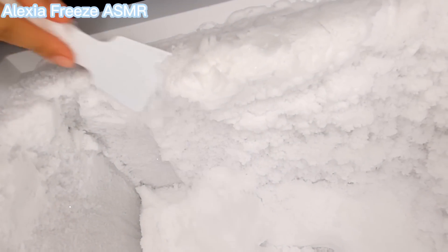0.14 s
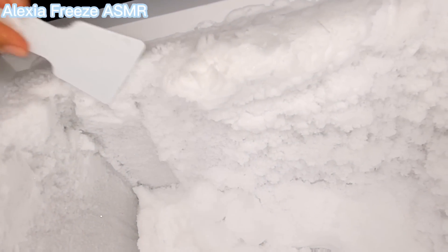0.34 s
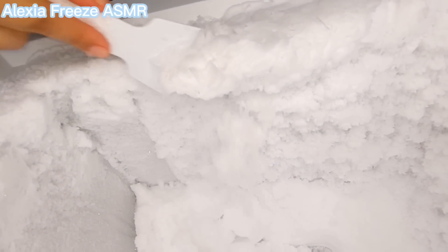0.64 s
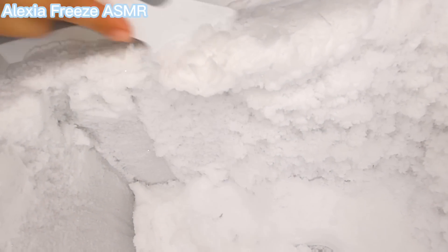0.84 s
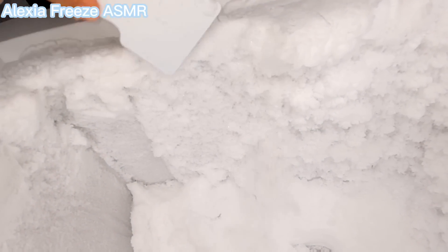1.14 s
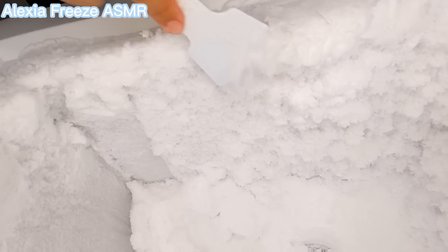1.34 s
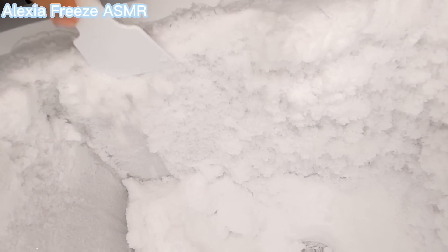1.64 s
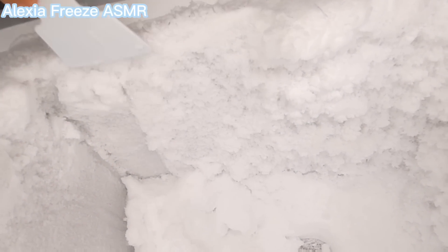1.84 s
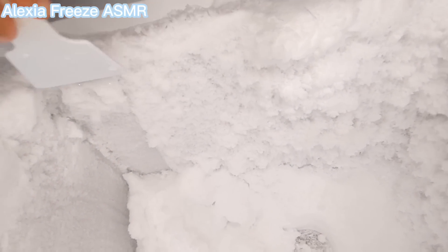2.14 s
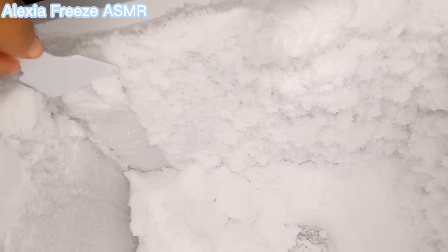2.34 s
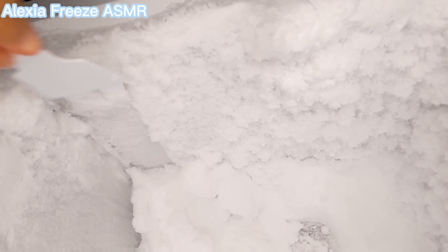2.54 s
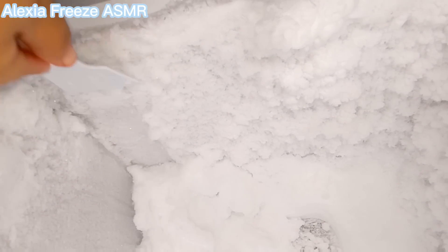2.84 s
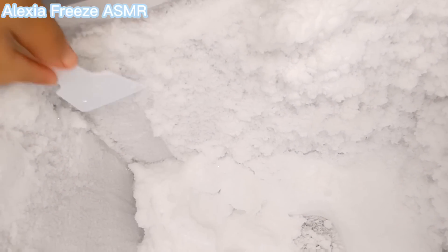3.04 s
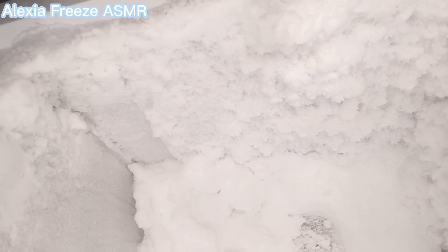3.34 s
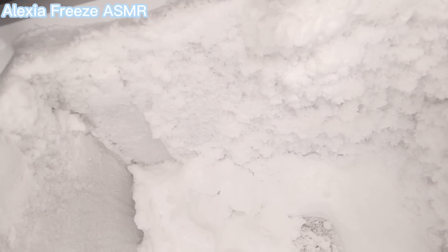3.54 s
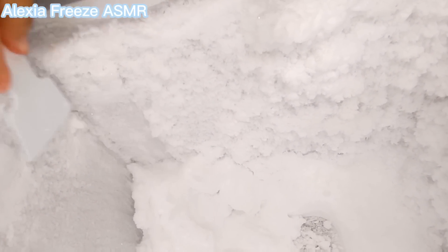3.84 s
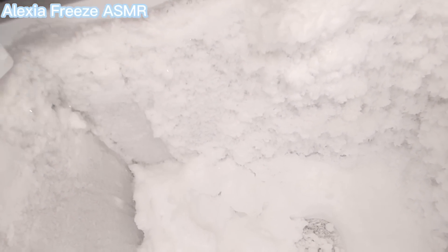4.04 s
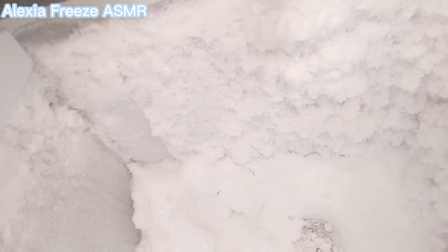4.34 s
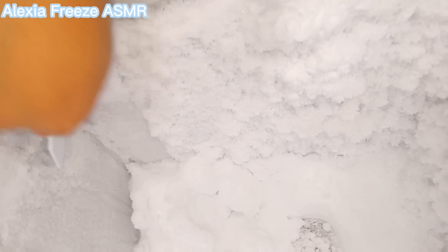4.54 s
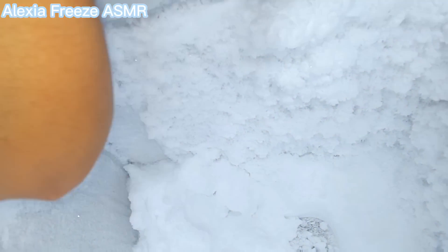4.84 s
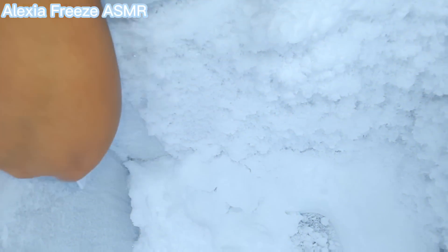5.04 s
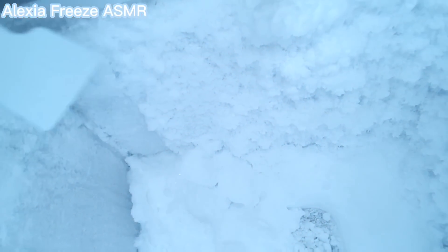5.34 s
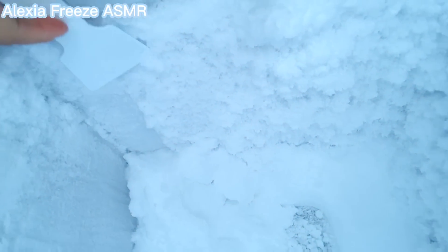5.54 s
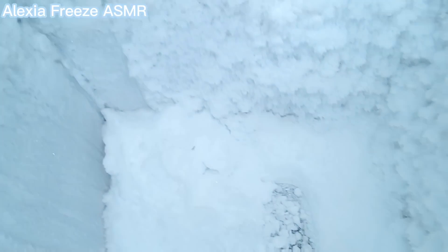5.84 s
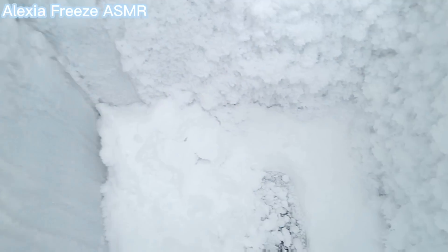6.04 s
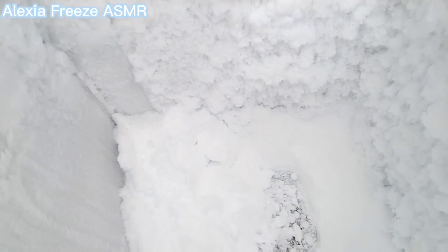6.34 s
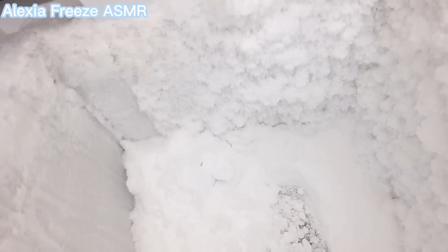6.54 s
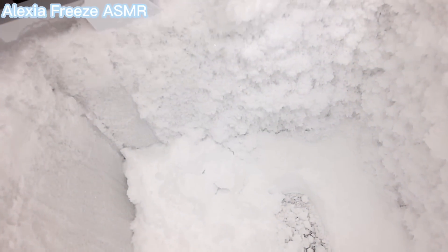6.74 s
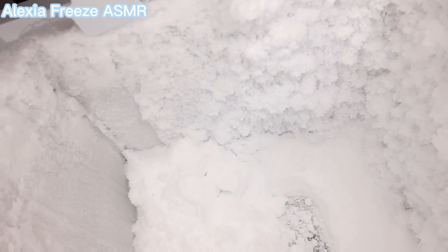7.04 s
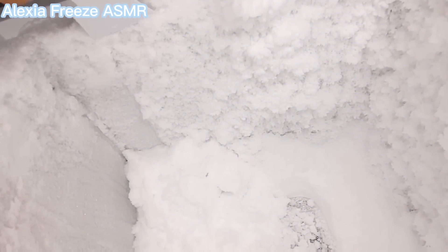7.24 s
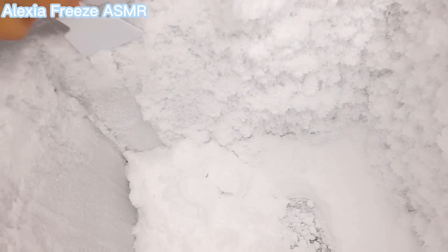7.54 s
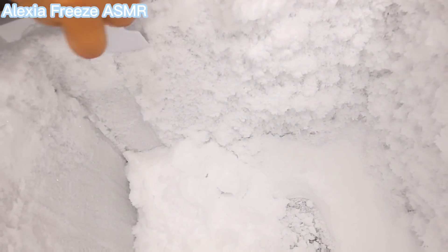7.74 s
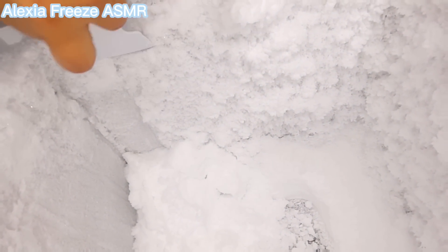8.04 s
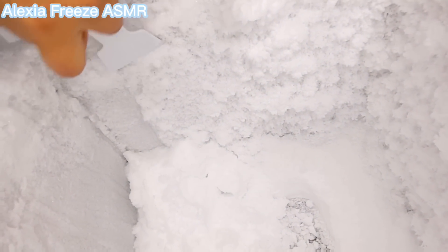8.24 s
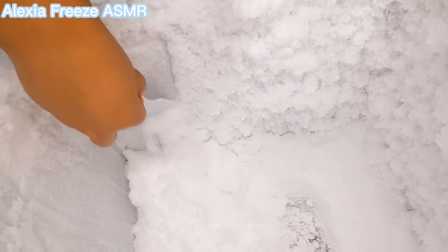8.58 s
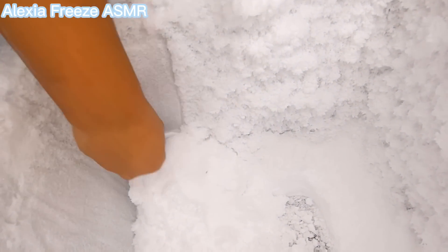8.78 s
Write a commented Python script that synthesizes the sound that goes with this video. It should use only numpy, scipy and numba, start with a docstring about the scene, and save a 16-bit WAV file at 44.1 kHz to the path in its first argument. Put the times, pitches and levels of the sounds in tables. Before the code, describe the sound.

Close, gritty scraping of frost inside a freezer, uneven quick strokes with crisp ice cracks, dull panel thumps, occasional knocks and a low hum.

```python
"""From the start a plastic scraper rasps in short strokes through thick frost inside a chest freezer.
Cracking ice crystals ring the blade, crust snaps off, and the push makes the freezer panels boom.
From 1.6 s something now and then knocks by the left port, most often from 5.6 s to 6.6 s.
The last half second is one long scrape. Short echoes from the box, the freezer's low hum and the rumble
of a hand on the stereo microphone run throughout. All sounds are filtered noise, clicks and sine waves."""
import sys
import numpy as np
from scipy import signal
from scipy.fft import rfft, irfft
from scipy.io import wavfile
from scipy.ndimage import uniform_filter1d
from numba import njit

SR = 44100
rng = np.random.default_rng(int(sys.argv[2]) if len(sys.argv) > 2 else 0)


def digitize_waveform(pressure):
    """Quantize a signal to 16-bit integers and store it at the path in sys.argv[1].

    Rows of a 2-D input are taken as channels; values are limited to [-1, 1].
    """
    field = np.atleast_2d(pressure).T
    bounded = np.clip(field, -1, 1)
    quanta = np.round(bounded * 32767).astype(np.int16)
    wavfile.write(sys.argv[1], SR, quanta)


N = 392931

# how hard the edge scrapes, one list of points a stroke: t/s, relative level/dB
STROKE_LEVELS = [
    [(0.0, -31), (0.148, -23), (0.166, -12), (0.266, -19.5), (0.296, -33.5), (0.332, -31.5), (0.352, -38),
     (0.36, -35)],
    [(0.36, -24), (0.426, -21.5), (0.456, -41), (0.466, -39), (0.48, -29), (0.494, -25), (0.5, -38)],
    [(0.5, -14), (0.504, -19.5), (0.542, -13.5), (0.548, -20), (0.582, -13.5), (0.644, -22.5), (0.678, -36),
     (0.7, -32)],
    [(0.7, -44), (0.714, -25.5), (0.772, -21), (0.792, -39), (0.806, -19.5), (0.812, -35), (0.85, -33)],
    [(0.85, -40), (0.864, -23.5), (0.922, -16), (0.98, -14), (1.02, -37), (1.03, -29), (1.164, -57),
     (1.2, -41)],
    [(1.2, -25), (1.214, -24.5), (1.254, -27), (1.312, -16), (1.324, -20.5), (1.354, -14.5), (1.426, -18),
     (1.47, -27)],
    [(1.47, -24.5), (1.522, -13.5), (1.604, -24.5), (1.648, -15.5), (1.656, -25), (1.74, -14),
     (1.772, -29.5), (1.78, -26)],
    [(1.78, -30), (1.796, -21), (1.822, -37.5), (1.884, -19.5), (1.964, -29.5), (1.968, -25),
     (2.004, -35.5), (2.015, -13)],
    [(2.015, -19.5), (2.035, -7), (2.045, -26), (2.153, -35), (2.173, -24.5), (2.207, -51), (2.301, -59),
     (2.317, -46)],
    [(2.317, -18), (2.353, -6), (2.373, -27), (2.399, -23), (2.461, -34), (2.475, -22.5), (2.651, -48.5),
     (2.662, -30)],
    [(2.662, -17), (2.71, -15), (2.716, -24), (2.754, -12.5), (2.828, -23), (2.848, -38), (2.906, -46),
     (2.92, -28)],
    [(2.92, -24), (2.946, -29), (3.002, -19.5), (3.08, -17), (3.09, -30), (3.266, -63.5), (3.506, -69),
     (3.52, -31)],
    [(3.52, -33), (3.524, -19.5), (3.558, -28.5), (3.594, -24), (3.626, -39.5), (3.764, -61), (3.82, -71),
     (3.837, -32)],
    [(3.837, -14.5), (3.881, -22.5), (3.891, -14), (3.911, -32.5), (3.923, -23.5), (3.981, -40),
     (4.139, -48), (4.156, -21)],
    [(4.156, -13.5), (4.178, -14), (4.196, -29.5), (4.25, -11), (4.284, -28.5), (4.304, -22),
     (4.348, -32.5), (4.378, -19)],
    [(4.378, -19), (4.418, -18), (4.436, -33.5), (4.472, -18.5), (4.592, -15.5), (4.606, -30), (4.62, -24)],
    [(4.62, -25), (4.73, -22), (4.758, -20), (4.764, -26), (4.84, -29), (4.86, -41), (4.886, -47),
     (4.894, -33)],
    [(4.894, -25.5), (4.946, -14), (5.106, -24.5), (5.248, -71), (5.274, -40), (5.282, -58), (5.506, -67),
     (5.517, -34)],
    [(5.517, -19), (5.581, -30.5), (5.605, -18), (5.661, -36), (5.675, -31.5), (5.717, -48), (5.735, -37.5),
     (5.77, -50)],
    [(5.77, -50), (5.786, -30), (5.794, -37), (5.858, -51), (5.882, -30), (5.896, -41.5), (5.936, -36),
     (5.944, -33)],
    [(5.944, -22.5), (5.998, -23), (6.08, -54), (6.084, -38), (6.246, -62.5), (6.306, -40), (6.388, -76),
     (6.396, -45)],
    [(6.396, -30), (6.43, -50), (6.44, -36), (6.462, -41), (6.476, -38), (6.49, -41), (6.544, -21),
     (6.66, -37.5)],
    [(6.66, -32), (6.67, -35.5), (6.74, -30), (6.768, -18.5), (6.806, -29), (6.862, -16.5), (6.898, -40),
     (6.905, -31)],
    [(6.905, -28), (6.909, -23), (6.927, -42), (7.003, -58), (7.015, -38), (7.047, -36), (7.103, -66),
     (7.137, -33)],
    [(7.137, -28.5), (7.161, -12.5), (7.227, -37.5), (7.235, -24), (7.257, -41), (7.349, -23),
     (7.449, -55.5), (7.52, -27.5)],
    [(7.52, -13), (7.6, -20), (7.626, -31.5), (7.658, -21.5), (7.816, -19.5), (7.874, -21.5), (7.898, -33),
     (7.903, -21)],
    [(7.903, -21), (7.917, -17.5), (8.025, -28.5), (8.033, -27), (8.105, -37), (8.125, -37), (8.135, -32),
     (8.145, -25)],
    [(8.145, -20), (8.169, -15), (8.189, -25.5), (8.229, -17), (8.245, -28.5), (8.313, -12.5),
     (8.343, -23.5), (8.35, -23)],
    [(8.35, -22), (8.396, -14.5), (8.884, -12.5), (8.91, -15)],
]
# colour of the coarse rasp: f/Hz, relative level per Hz/dB
RASP_COLOUR = [(150, -46.5), (250, -9), (358, -19), (555, -6), (920, -5.5), (1300, -6), (1810, -4),
               (2270, -6), (4720, -13.5), (6000, -20.5), (7800, -32.5), (13200, -120)]
# colour of the fine crystal hiss: f/Hz, relative level per Hz/dB
HISS_COLOUR = [(2060, -20.5), (3500, -1.5), (4710, -8.5), (7010, -0.5), (7640, -4), (9210, -1.5),
               (10700, -3), (12500, 0.5), (15400, -0.5)]
FIRM_DB = -20   # scrape level of a firm stroke


def scraper():
    """Shared stick-slip clumps shape rasp and hiss; the scrape level also sets the panels' boom."""
    bite_hiss_db, bite_s = 3, 0.075   # fresh crystals hiss brighter as a stroke bites, then this fades
    hiss_follows = 0.18   # harder scraping is brighter: dB per dB relative to a firm stroke
    wander_db, ring_wander, wander_hz = 2.5, .04, 10   # the hold is never quite still
    chip_per_slip = 0.83   # a jerky blade breaks off bigger chips: dB per dB of stick-slip

    scrape_db, = in_time([row for stroke in STROKE_LEVELS for row in stroke])
    since_s, (ring_hz, ring_db, low_db, hiss_db, slip_db, pan_db, load_db) = grip()
    hiss_db = hiss_db + bite_hiss_db * np.exp(-since_s / bite_s)
    hiss_db = hiss_db + hiss_follows * (scrape_db - FIRM_DB)
    ring_hz = ring_hz * (1 + ring_wander * drift(wander_hz))
    ring_db, low_db, hiss_db = [db + wander_db * drift(wander_hz) for db in (ring_db, low_db, hiss_db)]

    # rasp, ring and hiss share the power
    rasp_db = scrape_db - 10 * np.log10(1 + amp(2 * hiss_db) + amp(2 * ring_db))
    slip_db = np.clip(slip_db, 0, 8)
    clump_db = slip_db * (drift(190) + 0.35 * drift(16.6))
    clump_db = clump_db - 0.22 * slip_db ** 2   # deeper slips keep about the same mean power

    # both ports hear the middle of the edge; hand and frost hide each end from the far port
    middle, left, right = [shavings(clump_db, slip_db, ring_hz, ring_db, low_db, hiss_db) for _ in range(3)]
    edge = middle + amp(1.5) * np.array([left, right])
    edge = edge * amp([pan_db / 2 + 4.0, -pan_db / 2 - 0.5]) * amp(rasp_db - 3.5)

    chip_level_db = scrape_db + chip_per_slip * (slip_db - 3)
    crust = box(ports(snaps(chip_level_db)), t60=.008, wet_db=-3, size=512)
    return box(ports(edge), t60=.02, wet_db=-5, size=1024) + crust + panels(scrape_db, load_db)


def grip():
    """The hold of the blade at every sample, smoothed where it changes, and the time since the stroke began."""
    regrip_s = 0.073   # the hand settles into a new hold
    # one row a hold: start t/s, ring f/Hz, ring over rasp/dB, lowest blade modes over rasp/dB,
    # hiss over rasp/dB, stick-slip depth/dB, left over right/dB, load on the panels/dB
    holds = [(0, 2370, -3, -9, 5, 2.5, -4.5, 0), (.36, 2190, -5, -13, 2.5, 3, -3, 1),
             (.5, 2380, 1.5, -14, 4, 2.5, -4.5, 0), (.85, 2350, -0.5, -6.5, 6, 3, -4, -4.5),
             (1.2, 2270, -8.5, -5.5, 8, 2.5, -2.5, -1.5), (1.6, 2690, 0, -7.5, 6, 2.5, -4, 0.5),
             (2.015, 2430, -4, -1.5, 11, 4.5, -1.5, -3.5), (2.317, 2480, -3, -3, 10, 3, 2, -1.5),
             (2.662, 2410, -3.5, -13, 3.5, 3.5, 0.5, 1), (2.92, 2320, -9, 2, -0.5, 4, -2.5, -12),
             (3.0, 2300, 0.5, -7, 13, 4, -2, 0.5), (3.1, 2270, -6, -7, 2, 2.5, -1.5, 0),
             (3.52, 1900, -13, -5, 0, 2.5, 1.5, 2), (3.837, 2230, 2, -8, 3.5, 4, 0, 3),
             (4.156, 2130, 2.5, -3, 4.5, 3.5, 1, 1.5), (4.378, 2070, 3.5, -10, 8, 3.5, -2, -0.5),
             (4.62, 2110, -2.5, -11, 1, 3.5, 1, -1.5), (4.9, 2160, -2.5, -23, 0.5, 2.5, -2.5, -3.5),
             (5.517, 2330, -2.5, -5.5, -1.5, 4, -2.5, 0.5), (5.94, 2080, -29, -4, 8, 2, 2, 3.5),
             (6.396, 2170, -8, -8, 7.5, 3.5, 0.5, 1.5), (6.66, 2000, -5.5, -3, 8.5, 2.5, 0.5, 1),
             (6.9, 1870, -2, -1.5, 6, 2.5, 0, 3), (7.14, 1820, -7, -4, 3.5, 3, 1.5, -3),
             (7.27, 1690, 2, 2, 5.5, 3, 1.5, 2), (7.52, 2230, -12.5, -3, 1.5, 2, 0, -1),
             (7.903, 2780, -6.5, -9, 5.5, 2.5, -0.5, -1), (8.15, 2870, -3.5, -6.5, 6.5, 2, 0, 3),
             (8.359, 1590, -3.5, 0.5, -0.5, .5, -0.5, 5), (8.44, 1530, -2.5, -3.5, 9.5, 1, -2, -4.5),
             (8.66, 2000, 1, -14, 11.5, 2, -4, -14), (8.72, 2300, 4, -6, 6.5, -2.2, 0, -7)]
    t = np.arange(N) / SR
    rows = np.array(holds, float)
    starts = np.array([stroke[0][0] for stroke in STROKE_LEVELS])
    held = rows[np.searchsorted(rows[1:, 0], t), 1:].T
    since_s = t - starts[np.searchsorted(starts[1:], t)]
    return since_s, uniform_filter1d(held, int(regrip_s * SR) + 1)


def shavings(clump_db, slip_db, ring_hz, ring_db, low_db, hiss_db):
    """One stretch of the edge: coarse cracks rasp and ring the blade, fine ones hiss."""
    # plastic blade modes, low to high: f/Hz, width/Hz, relative level/dB
    blade_modes = [(1277, 51, 0), (1431, 55, -0.5), (3170, 330, 5), (4700, 140, -40), (7080, 90, -7)]
    spread_db = 2.0 + 0.75 * slip_db   # a jerky blade breaks uneven pieces, a steady one shaves powder
    coarse = cracks(7000, spread_db, clump_db)
    flexing = cracks(7000, spread_db, clump_db)
    fine = cracks(14000, spread_db, clump_db + 0.65 * slip_db * drift(260))

    rasp = rms_one(colour(coarse + amp(-1.5) * resonances(coarse, blade_modes[2:4]), RASP_COLOUR))
    ring = amp(ring_db) * rms_one(moving_ring(flexing, ring_hz, 220.0, SR))
    low_ring = amp(low_db) * rms_one(resonances(flexing, blade_modes[:2]))
    hiss = rms_one(colour(fine + amp(-6) * resonances(fine, blade_modes[4:]), HISS_COLOUR))
    return rasp + ring + low_ring + amp(hiss_db) * hiss


def cracks(per_s, spread_db, clump_db):
    """Crystals break at random, mostly small, in clumps of a few ms as the edge sticks and slips."""
    sizes = amp(spread_db * np.minimum(rng.exponential(1, N), 5)) * rng.choice([-1, 1], N)
    clicks = sizes * (rng.random(N) < per_s / SR)
    even = clicks / np.sqrt(uniform_filter1d(clicks ** 2, SR // 4))   # same power in each quarter second
    return even * amp(clump_db)


@njit
def moving_ring(x, hz, width_hz, rate):
    """A resonance whose centre follows a curve, like a blade whose free length changes."""
    out, r = np.zeros(len(x)), np.exp(-np.pi * width_hz / rate)
    for i in range(2, len(x)):
        feedback = 2 * r * np.cos(2 * np.pi * hz[i] / rate) * out[i - 1] - r * r * out[i - 2]
        out[i] = x[i] - x[i - 2] + feedback
    return out


def snaps(chip_level_db):
    """Crust snaps at each port: a sharp tick that rings the blade, then crumbs dying in a few ms."""
    # crusts that snap: t/s, level/dB, left over right/dB, crumbs over level/dB, treble over body/dB
    crusts = [(0.0726, -4, -4, -12, 5), (0.1223, -5, -9, -13, 6), (0.1535, -18, -6.5, -13, -2),
              (0.3262, -5, 21, -8, -8), (0.3625, 3, 0, -8, -10), (0.4805, -8, -16, -13, -2),
              (0.5074, -10, -10, -11, 12), (0.5347, -7, 5, -15, -7), (0.8046, -15, 3, -13, -6),
              (0.9093, -14, -3, -13, 0), (1.0335, -9, -1, -16, 7), (1.1967, -23, -10, -16, 6),
              (1.5716, -1, -7.0, -13, 7), (1.6158, 0.5, -3, -16, 11), (1.969, 6, 5, -14, -5),
              (2.017, -2, -7, -13, 5), (2.0593, 2, 7, -10, -3), (2.1704, -16, -7, -13, 9),
              (2.3156, -3, -1, -14, 9), (2.4029, -1.5, 0, -14, 3), (2.4778, -10, -14, -12, 9),
              (2.5117, -13, -13, -11, 5.5), (2.6275, -18, -11, -11, 0), (2.6642, 8, 3, -12, 2),
              (2.7094, -8, -3.5, -13, -2), (2.7995, -6, -4, -13, -1), (2.923, 4, 5, -11.5, -5),
              (2.9966, -9, -7.0, -13, -2), (3.0553, 4, -9, -12, -9), (3.5225, -8, -16, -8, 5.5),
              (3.8367, -2, -15, -13, 2), (3.8871, -4, -8, -10, 0), (3.921, -7, 0, -15, 8),
              (4.0128, -22, 2, -13, 5), (4.0395, -21, -3, -13, 3), (4.1576, 1, -7, -9, 4),
              (4.2148, 2.5, 0, -13, -8), (4.243, 2, -8, -13, 2), (4.3196, -7, 9, -13, -4),
              (4.3795, 6, -9, -11, -14), (4.449, -15, -21, -13, 4), (4.6354, -18, 3, -13, 0),
              (4.7471, -2, -9, -7, -8), (4.894, -10, 1, -13, 0), (5.2699, -31, 2, -13, -3),
              (5.518, -4.5, -6, -13, 0.5), (5.5955, -14, -9, -11, 6), (5.6086, -11, 7, -15, -7),
              (5.671, -29, 4, -13, 0), (5.7354, -16, -3, -13, -5), (5.7813, -18, -10, -15, -1),
              (5.8162, -34, 4, -13, -5), (5.8807, -8, 4, -14, 5.5), (5.9204, -25, -6, -13, 3),
              (5.9443, -8, -11, -15, 4), (6.0876, -8, -5, -10, -17), (6.1014, -26, 2.0, -13, 0),
              (6.1485, -23, -4, -13, 3), (6.3975, -5, 1, -13, -6), (6.4388, -4.5, 14, -13, -15),
              (6.4742, -26, 1.5, -11, -4), (6.5844, -9, -7.5, -16, 3), (6.616, -7, -3.0, -15, -2),
              (6.766, -11, -7, -11, -1), (6.838, -10, -4, -13, 11), (6.9075, -10, -5, -13, 7),
              (7.019, -18, -5, -13, 2), (7.1365, -8, -1, -13, 2), (7.2365, -3, 0, -13, 1.5),
              (7.3522, -5.5, -12, -9, 1), (7.4794, -8.5, -2, -14, -3), (7.5212, 8, 4, -13, -5),
              (7.9042, 1, -8, -13, -2), (8.0327, 6, -7, -12, -5), (8.1233, -10.5, -3, -14, 7.5)]
    tick_db = 7   # the first sharp break, over the snap's level
    chip_count, chip_db, chip_spread_db, chip_pan_db = 160, 8, 5, -3   # small snaps at random times

    dull, bright = np.zeros((2, 2, N + SR))
    t = np.arange(SR // 16) / SR
    grit = rng.standard_normal(N + SR)
    when, size, side, loose, sharp = rng.random((chip_count, 5)).T
    chip_sizes_db = chip_level_db[(when * N).astype(int)] + chip_db - chip_spread_db * np.log(1 - .9 * size)
    chips = np.transpose([when * N / SR, chip_sizes_db, chip_pan_db + 16 * (side - .5),
                          -18 + 12 * loose, 12 * (sharp - .5)])   # same columns as crusts
    for s, db, pan_db, crumb_db, bright_db in list(crusts) + list(chips):
        i = round(s * SR)
        crumbs = amp(crumb_db - 60 * t / 0.024) * grit[i:i + len(t)]
        snap = crumbs + amp(tick_db) * (t == 0)
        snap = snap * amp(db + np.array([[pan_db / 2], [-pan_db / 2]]))
        dull[:, i:i + len(t)] += snap
        bright[:, i:i + len(t)] += snap * amp(bright_db)

    heard = []
    for d, b in zip(dull, bright):
        body = amp(-1.5) * colour(d, RASP_COLOUR)
        treble = amp(-3.0) * colour(b, HISS_COLOUR)
        blade_ring = amp(2.0) * resonances(d[:N], [(2260, 440, 0)])
        heard.append(body + treble + blade_ring)
    return np.array(heard)


def panels(scrape_db, load_db):
    """The walls hum along a little behind the scrape; a shove swells the wall and thumps the deep panel."""
    # wall modes: f/Hz, width/Hz, relative level/dB
    wall_modes = [(133.2, 2.5, 2.5), (170, 25.6, 0), (232.7, 11.1, 2), (283, 165, -13)]
    # deep panel modes: f/Hz, width/Hz, relative level/dB
    deep_modes = [(62.5, 16.6, -11), (89, 19, -2.5), (113.5, 16.6, 0)]
    # shoves that set the panels booming: t/s, level/dB, deep panel over wall/dB
    shoves = [(0.083, -24, -19), (0.378, -21, -6), (0.553, -27, -8), (0.61, -14.5, -7), (0.731, -23, -15),
              (0.99, -18.5, -0.5), (1.204, -15, -14), (1.381, -16, -6.5), (1.522, -19, -7), (1.757, -27, 3),
              (2.363, -19.5, 4.5), (2.68, -23, -10), (2.759, -34, -13), (2.927, -22, -8), (3.025, -26.5, 2),
              (3.548, -20, -3.5), (3.852, -22, -4), (4.181, -19.5, 0), (4.487, -19, 2.5),
              (4.579, -12, -5.5), (4.786, -25.5, -17), (4.942, -15, 0.5), (5.017, -18, -2),
              (6.793, -17.5, -15), (6.857, -15, -7), (7.171, -17, 1.5), (7.237, -24, 1.5),
              (7.534, -9.5, -2), (7.607, -12, -5), (7.724, -21, -5), (7.942, -14.5, -9), (8.048, -14, -4.5),
              (8.184, -15, -7), (8.345, -24, 4), (8.399, -12.5, -11)]
    wall_db, wall_follows = -36.5, 0.66   # level under a firm stroke, then dB per dB of force
    deep_db, deep_follows = -43, 0.34
    lag_s = 0.0084
    swell_rise_s, thump_rise_s, wall_decay_s, deep_decay_s = 0.0088, .015, 0.038, 0.031

    r = np.exp(-1 / (lag_s * SR))
    power = signal.lfilter([1 - r], [1, -r], amp(2 * (scrape_db - FIRM_DB)))
    force_db = 10 * np.log10(power + 1e-9)
    wall = amp(load_db + wall_db + wall_follows * force_db)
    deep = amp(load_db + deep_db + deep_follows * force_db)

    swell, thumps = np.zeros((2, N + SR))
    t = np.arange(SR // 3) / SR
    swell_shape = (1 - np.exp(-(t / swell_rise_s) ** 2)) * np.exp(-t / wall_decay_s) / 2
    thump_shape = (1 - np.exp(-(t / thump_rise_s) ** 2)) * np.exp(-t / deep_decay_s)
    hz, _, mode_db = np.transpose(deep_modes)
    # each shove draws its own pitch, phase and level for every deep mode
    for (s, db, over_db), chance in zip(shoves, rng.random((len(shoves), 3, len(deep_modes)))):
        i = round(s * SR)
        swell[i:i + len(t)] += (amp(db) * swell_shape) ** 2
        cycles = np.outer(t, hz * (1 + 0.19 * (chance[0] - .5))) + chance[1]
        tones = np.sin(2 * np.pi * cycles) @ amp(mode_db - 2 * chance[2])
        thumps[i:i + len(t)] += amp(db + over_db) * thump_shape * tones

    wall_boom = np.sqrt(wall ** 2 + swell[:N]) * boom(wall_modes)
    deep_boom = deep * boom(deep_modes)
    return wall_boom + deep_boom + resonances(thumps[:N], [(106, 160, 0)]) * amp([[-1.5], [1.5]])


def boom(modes):
    """The uneven push rings the panels; long waves reach both ports almost alike."""
    push = rng.standard_normal((2, N)) * amp(1.2 * drift(45.0))
    shared, beside = [rms_one(resonances(resonances(p, modes), [(141, 590, 0)])) for p in push]
    return shared + amp(-16.0) * beside * np.array([[1], [-1]])


def knocks():
    """A bending wave through the casing: high tones arrive first, so each knock falls in pitch."""
    # knocks by the left port: t/s, level/dB
    knock_times = [(1.587, -5.5), (2.269, -33), (5.6063, -2), (6.0118, -14), (6.101, -6.5), (6.344, -31),
                   (6.4752, -1), (6.522, -19), (6.617, -15.5), (6.6246, -7)]
    crack_db, crack_s = -12, .0015   # noise of the contact itself: level and decay time
    out = np.zeros(N)
    t = np.arange(SR // 16) / SR
    hz = 140 + 900 * np.exp(-t / 0.00198)
    shape = np.sin(2 * np.pi * np.cumsum(hz) / SR) * (1 - np.exp(-t / 0.00046))
    shape *= np.exp(-t / 0.004) + 0.16 * np.exp(-t / 0.022)   # quick decay, then a weak tail
    for s, db in knock_times:
        i = round(s * SR)
        crack = amp(crack_db) * np.exp(-t / crack_s) * rng.standard_normal(len(t))
        out[i:i + len(t)] += amp(db) * (shape + resonances(crack, [(2000, 3500, 0)]))
    return out * amp([[0], [-20]])   # much weaker on the right


def freezer():
    """Low hum shared by the ports; air and settling frost above it unshared."""
    # colour of hum and air: f/Hz, relative level per Hz/dB
    hum_colour = [(15, -80), (25, -49), (35, -50), (59, -7.5), (71, 0), (86, -8), (143, -15), (432, -21.5),
                  (468, -19.5), (612, -21.5), (2220, -27.5), (2540, -27.5), (15400, -36)]
    hum_db = -47
    low, left, right = [colour(v, hum_colour) for v in rng.standard_normal((3, N))]
    bass = signal.butter(2, 350, fs=SR, output="sos")
    air = np.array([left, right])
    # below about 350 Hz, swap each port's own noise for the shared one
    return amp(hum_db) * rms_one(air + signal.sosfilt(bass, low - air))


def handling():
    """Lumpy rumble from the hand that holds the microphone: noise through two low resonances."""
    # hand on the microphone: t/s, relative level/dB
    rumble_levels = [(0.0, -38), (0.55, -46), (0.69, -47), (1.34, -36.5), (1.84, -71), (4.07, -47),
                     (6.23, -42), (7.07, -49), (7.47, -42), (8.26, -45), (8.61, -47), (8.91, -53)]
    level_db, = in_time(rumble_levels)
    rumble = resonances(resonances(rng.standard_normal(N), [(54, 60, 0)]), [(57, 41, 0)])
    return amp(level_db - 5.0) * rms_one(rumble)


def box(x, t60, wet_db, size):
    """Frosted walls a hand away: short dense echoes, blending into a new random pattern every size samples."""
    t = np.arange(size) / SR
    starts = np.arange(0, N + size, size)
    padded = np.pad(x, ((0, 0), (size, 3 * size)))
    window = np.sin(np.pi * np.arange(2 * size) / (2 * size)) ** 2   # overlapping pieces add up to one
    pieces = padded[:, starts[:, None] + np.arange(2 * size)] * window
    fade = amp(-60 * t / t60) * (t > .0003)   # t60: seconds to fall by 60 dB
    echoes = rng.standard_normal((2, len(starts), len(t))) * fade / np.linalg.norm(fade)
    heard = irfft(rfft(pieces, 3 * size) * rfft(echoes, 3 * size)).reshape(2, len(starts), 3, size)
    out = np.zeros((2, len(starts) + 3, size))
    for k in range(3):
        out[:, k:k + len(starts)] += heard[:, :, k]
    return x + amp(wet_db) * out.reshape(2, -1)[:, size:size + N]


def ports(x):
    """The left port hears the blade later, and each port has its own shading."""
    # shading: f/Hz, left over right/dB
    shading = [(60, -4), (110, 2), (200, -18.5), (380, 3.5), (700, -4), (1290, -6), (2380, -3), (4400, -13),
               (8120, -12), (15000, -7.5)]
    left_lag_s = .0004
    late = np.concatenate([np.zeros(round(left_lag_s * SR)), x[0]])[:N]
    tilt = np.array(shading, float)
    return np.array([colour(late, tilt * [1, .5]), colour(x[1], tilt * [1, -.5])])


def amp(db):
    """Decibels to a plain factor."""
    return 10 ** (np.asarray(db) / 20)


def rms_one(x):
    """Scale to an average (RMS) level of 1."""
    return x / np.sqrt(np.mean(x ** 2) + 1e-20)


def in_time(rows):
    """Columns of a curve table at every sample."""
    s, *columns = np.transpose(rows)
    return [np.interp(np.arange(N) / SR, s, c) for c in columns]


def at_hz(points, hz):
    """A spectrum read on a log-frequency axis."""
    hz_points, db = np.transpose(points)
    return np.interp(np.log(hz + 1), np.log(hz_points + 1), db)


def colour(x, points):
    """Minimum-phase filter with the given dB curve, so nothing sounds early."""
    size = 8192
    cepstrum = irfft(np.log(amp(at_hz(points, np.fft.rfftfreq(size, 1 / SR)))))
    cepstrum[1:size // 2] *= 2   # fold the late half onto the early half
    cepstrum[size // 2 + 1:] = 0
    return signal.oaconvolve(x, irfft(np.exp(rfft(cepstrum))))[:N]


def drift(rate):
    """Random wander of spread 1, smoothed above rate in Hz."""
    r = np.exp(-2 * np.pi * rate / SR)
    wander = signal.lfilter([1], [1, -2 * r, r * r], rng.standard_normal(N + SR))
    return rms_one(wander[SR:])   # skip the filter's first second


def resonances(x, modes):
    """Parallel resonances, each given as (f/Hz, width/Hz, level/dB), with alternating sign."""
    out = 0
    for k, (hz, width_hz, db) in enumerate(modes):
        r = np.exp(-np.pi * width_hz / SR)
        b = np.array([1, 0, -1]) * (1 - r * r) / 2
        a = [1, -2 * r * np.cos(2 * np.pi * hz / SR), r * r]
        out = out + (-1) ** k * amp(db) * signal.lfilter(b, a, x)
    return out


def scene():
    """Scraper, echoing knocks, freezer and handling together."""
    return scraper() + box(knocks(), t60=0.09, wet_db=-13.5, size=1024) + freezer() + handling()


def record(dry):
    """Peaks are rounded, then two steep low-passes remove the treble near 16 kHz and above."""
    rounded = .9 * np.tanh(dry / .9)
    soft = signal.sosfilt(signal.cheby2(10, 30, 15800, fs=SR, output="sos"), rounded)
    return signal.sosfilt(signal.cheby2(12, 70, 16650, fs=SR, output="sos"), soft)


dry = scene()
out = record(dry)
digitize_waveform(out)
```